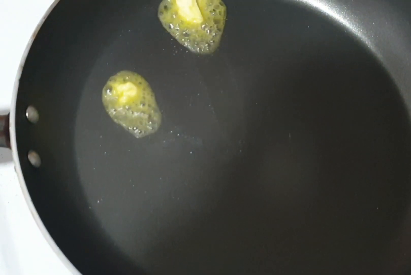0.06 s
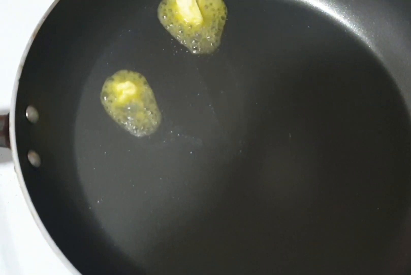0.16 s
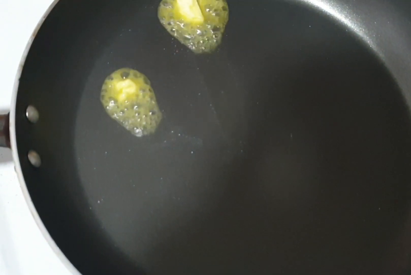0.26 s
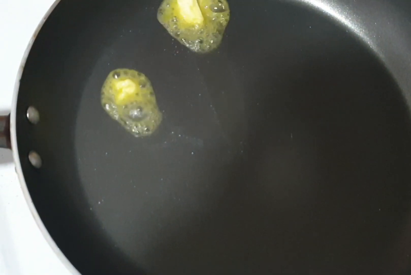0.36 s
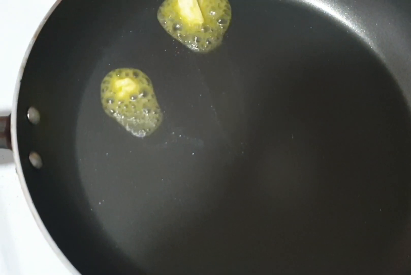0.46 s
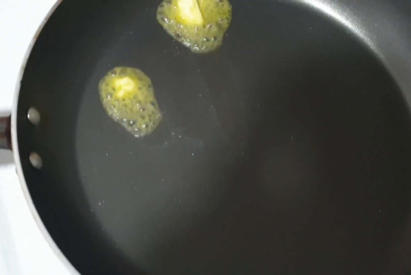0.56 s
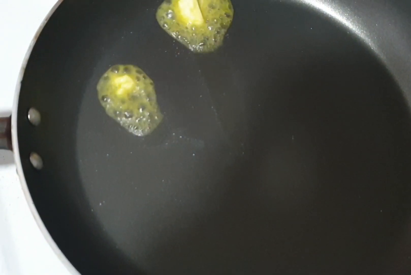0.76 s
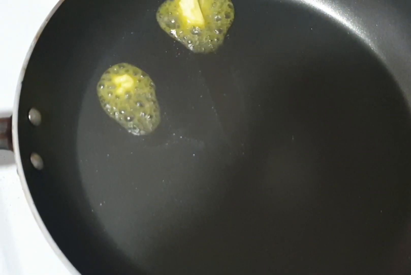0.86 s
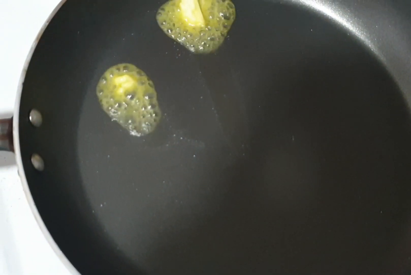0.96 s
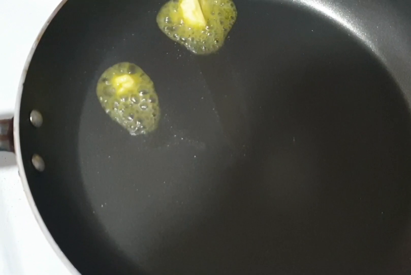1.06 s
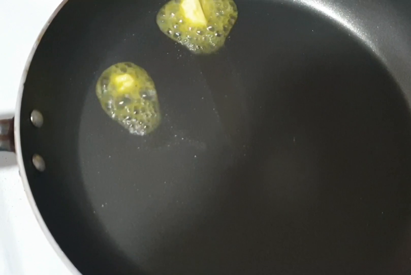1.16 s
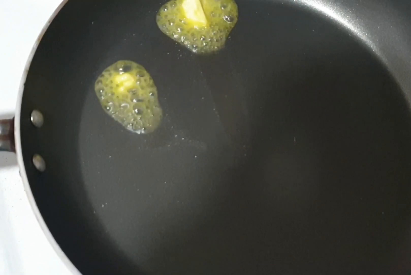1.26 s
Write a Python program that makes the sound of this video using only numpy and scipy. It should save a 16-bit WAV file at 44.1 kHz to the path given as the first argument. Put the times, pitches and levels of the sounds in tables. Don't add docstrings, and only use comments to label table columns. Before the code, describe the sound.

Butter sizzles close by in a hot pan, a dense bright fizz with small sharp pops. Early on, steel cutlery drops on the worktop, clanks, rattles and rings in a hard kitchen over faint extractor hum.

```python
import sys
import numpy as np
from scipy import signal
from scipy.fft import rfft, irfft, next_fast_len
from scipy.io import wavfile
from scipy.ndimage import uniform_filter1d, map_coordinates

SR = 44100
rng = np.random.default_rng(int(sys.argv[2]) if len(sys.argv) > 2 else 0)


def volts_from_db(level):
    exponent = np.asarray(level, float) / 20
    return 10 ** exponent


def to_wav(sig):
    pcm = np.clip(np.atleast_2d(sig), -1, 1) * 32767
    pcm = np.round(pcm).astype(np.int16)
    wavfile.write(sys.argv[1], SR, pcm.T)


N = 57330
TIME_S = np.arange(N) / SR

# (frequency [Hz], density [dB per Hz])
WORKTOP_COLOUR = [(150, -28.5), (300, -19.5), (800, -19), (1300, -5), (2000, -6.5), (3300, -5), (5500, -15),
                  (8500, -16.5), (15900, -23)]


def unit(x):
    return x / np.sqrt(np.mean(x ** 2) + 1e-20)


def along(points, hz):
    point_hz, value = np.transpose(points)
    return np.interp(np.log(hz + 1), np.log(point_hz + 1), value)


def wobble(knots_per_s):
    knots = rng.standard_normal(int(N * knots_per_s / SR) + 4)
    return map_coordinates(knots, [np.arange(N) * knots_per_s / SR])


def colour(x, points):
    size = next_fast_len(N + 8192)
    gain = volts_from_db(along(points, np.fft.rfftfreq(size, 1 / SR)))
    return irfft(rfft(x, size) * gain, size)[..., :N]


def patchy(patchy_db):
    z = signal.stft(rng.standard_normal((2, N)), nperseg=256)[2]
    field = uniform_filter1d(rng.standard_normal(z.shape[1:]), size=10, axis=0)
    field = uniform_filter1d(field, size=5, axis=1)
    noise = signal.istft(z * volts_from_db(patchy_db * unit(field)), nperseg=256)[1]
    return unit(noise[:, :N])


def bursts(start_s, gain, hz, cycles, size=256):
    t = np.arange(size) / SR
    age = 6 * t * hz[:, None] / cycles
    envelope = gain[:, None] * (age / 2) ** 2 * np.exp(2 - age)
    first = np.round(start_s * SR).astype(int)
    index = (first[:, None] + np.arange(size)).ravel()
    ports = []
    for phase in rng.uniform(0, 2 * np.pi, (len(start_s), 2)).T:
        waves = envelope * np.sin(2 * np.pi * hz[:, None] * t + phase[:, None])
        ports.append(np.bincount(index, waves.ravel(), N + size)[:N])
    return np.array(ports)


def alike(pair):
    # (frequency [Hz], left-right correlation [0..1])
    likeness = [(60, 0.28), (130, 0.84), (290, 0.971), (640, 0.43), (1400, 0.19), (3000, 0.013)]
    turn = [(hz, np.arccos(np.clip(c, 0, 1)) / 2) for hz, c in likeness]
    mid = colour(pair[0], [(hz, 20 * np.log10(np.cos(u))) for hz, u in turn])
    side = colour(pair[1], [(hz, 20 * np.log10(np.sin(u) + 1e-3)) for hz, u in turn])
    return np.array([mid + side, mid - side])


def shade(pair, points):
    return np.array([pair[0], colour(pair[1], points)])


def bubble_bed(count=5000):
    # (time [s], level [dB])
    heat = [(0.0, -46.5), (0.22, -47), (0.52, -47.5), (1.3, -49)]
    # (frequency [Hz], density [dB per Hz])
    fizz = [(880, -23.5), (1500, -17), (3050, -12.5), (5310, -3), (7960, -10.5), (10600, -0.5), (12800, -1),
            (13800, -4), (15900, -7.5)]
    fizz_db, grain_db, spread_db, patchy_db = 11.5, -6, 3.5, 1.5
    centre_hz, grain_cycles = 9130, 2.26
    heat_s, strength_db = np.transpose(heat)
    level_db = np.interp(TIME_S, heat_s, strength_db)

    busy = np.cumsum(volts_from_db(4.5 * wobble(45)))
    draw = rng.random((count, 2))
    start_s = np.interp(draw[:, 0], busy / busy[-1], TIME_S)
    hz = np.clip(centre_hz * np.exp(0.52 * rng.standard_normal(count)), 1500, 15500)
    gain = volts_from_db(-spread_db * np.log(draw[:, 1] + 0.0065))
    grains = unit(bursts(start_s, gain, hz, grain_cycles))

    bed = colour(patchy(patchy_db) + volts_from_db(grain_db) * grains, fizz)
    return bed / np.std(bed[0]) * volts_from_db(fizz_db + level_db + 0.27 * wobble(13))


def bubble_pops(pop_s, peak_db, hz):
    pop_db, pop_cycles = -1.5, 9
    echo_db, echo_s = -8, .0027
    snap_db, snap_cycles = -6.5, 1.8
    pops = bursts(pop_s, volts_from_db(peak_db + pop_db), hz, pop_cycles)
    echoes = bursts(pop_s + echo_s, volts_from_db(peak_db + pop_db + echo_db), hz, pop_cycles)
    snaps = bursts(pop_s, volts_from_db(peak_db + snap_db), 0.79 * hz, snap_cycles)
    return pops + echoes + snaps


def sizzle():
    # (time [s], peak [dB], frequency [Hz])
    pop_table = [(0.041, -17, 13100), (0.1341, -18.5, 10440), (0.5184, -31, 4570), (0.5474, -27.5, 9880),
                 (0.578, -23.5, 5760), (0.6677, -23.5, 5850), (0.7684, -19.5, 10800), (0.8524, -28, 13500),
                 (0.8999, -24, 10400), (0.9724, -24.5, 10100), (1.0136, -21.5, 11500),
                 (1.0285, -15.5, 14300), (1.0404, -50, 10200), (1.069, -36, 9770), (1.1036, -27, 5530),
                 (1.2164, -18.5, 5100), (1.2468, -23, 10400)]
    # (frequency [Hz], level [dB])
    pan_shadow = [(200, 11.5), (700, -30), (1300, -3), (2400, -29), (4400, -57), (7600, -40), (11000, -20),
                  (15000, -38.5)]
    spatter_db, spatter_s, spatter_ref_db = 1.5, 0.009, -23.5
    bed = bubble_bed()
    pop_s, peak_db, hz = np.transpose(pop_table)
    pop_s = pop_s + .0007
    pops = bubble_pops(pop_s, peak_db, hz)
    distance = (TIME_S - pop_s[:, None] - spatter_s / 2) / spatter_s
    weight = np.minimum(volts_from_db(peak_db - spatter_ref_db), 1)
    spatter = (weight[:, None] * np.exp(-distance ** 2)).max(axis=0)
    return shade(bed * volts_from_db(spatter_db * spatter) + pops, pan_shadow)


def extractor():
    # (frequency [Hz], density [dB per Hz])
    air_colour = [(94, -2), (160, 0.5), (176, -10.5), (286, -2.5), (405, -11.5), (723, 0.5), (784, 1.5),
                  (1270, -16.5), (4000, -15.5), (5200, -18), (8800, -120)]
    # (frequency [Hz], density [dB per Hz])
    rumble_colour = [(13, -33), (22, -34), (32, -8), (54, -26), (66, -7.5), (76, -5), (128, -11),
                     (173, -31), (200, -17), (260, -47), (440, -120)]
    # (frequency [Hz], level [dB rms])
    motor_lines = [(51, -51), (68, -60), (123, -59), (740, -66.5)]
    air_db, rumble_db = -59, -60
    air = volts_from_db(air_db) * unit(colour(alike(patchy(1.2)), air_colour))
    rumble = volts_from_db(rumble_db) * unit(colour(alike(patchy(0.3)), rumble_colour))
    hum = 0
    for hz, level_db in motor_lines:
        gain = volts_from_db(level_db - 2.5 + 4.1 * wobble(7.05))
        hum = hum + gain * np.sin(2 * np.pi * hz * TIME_S + 0.68 * wobble(6.8))
    low = rumble + hum * volts_from_db([[1.1], [-1.1]])
    return air * volts_from_db([[.6], [-.6]]) + low * volts_from_db([[1.6], [-1.6]])


def room(x):
    # (frequency [Hz], T60 [s])
    kitchen_decay = [(200, 0.7), (1000, 0.63), (4000, 0.49), (12000, 0.45)]
    hz, t, z = signal.stft(alike(rng.standard_normal((2, N))), SR, nperseg=256)
    decay_db = -60 * t / along(kitchen_decay, hz)[:, None]
    tail = signal.istft(z * volts_from_db(decay_db), SR, nperseg=256)[1]
    return signal.fftconvolve(x[None], tail / np.linalg.norm(tail[0]), axes=1)[:, :N]


def strike(contacts, modes_hz, modes):
    treble_hz = 9000
    blow_t60_s, rise_s = 0.042, .0015
    blow_offset_db, ring_offset_db = 4.5, -13
    blow_wet_db, ring_wet_db = 5.5, -10
    rock_db, rock_rad, rock_per_s = 3, 1, 90
    hz = np.c_[modes_hz]
    mode_db, t60_s = np.transpose(modes)[:, :, None]
    treble = hz > treble_hz

    blow_power, ring_power = 0, 0
    for contact_s, blow_db, ring_db, treble_db in contacts:
        age_s = np.clip(TIME_S - contact_s, 0, None)
        rise = 1 - np.exp(-age_s / rise_s)
        level_db = ring_db + ring_offset_db + mode_db + treble_db * treble
        ring_power = ring_power + (rise * volts_from_db(level_db - 60 * age_s / t60_s)) ** 2
        blow = rise * volts_from_db(blow_db + blow_offset_db - 60 * age_s / blow_t60_s)
        blow_power = blow_power + blow ** 2

    rock = np.array([[[wobble(rock_per_s) for _ in modes] for _ in "LR"] for _ in "ap"])
    partials = np.sin(2 * np.pi * hz * TIME_S + rock_rad * rock[1])
    ring = (np.sqrt(ring_power) * volts_from_db(rock_db * rock[0]) * partials).sum(axis=1)
    blows = colour(np.sqrt(blow_power) * alike(rng.standard_normal((2, N))), WORKTOP_COLOUR)
    return ring + blows + room(volts_from_db(blow_wet_db) * blows[0] + volts_from_db(ring_wet_db) * ring[0])


def slide():
    start_s, end_s, end_db, db_per_s = 0.218, .25, -6.5, 672
    gain = volts_from_db(end_db + db_per_s * np.minimum(TIME_S - end_s, 0))
    gain = gain * (TIME_S > start_s) * (TIME_S < end_s)
    return colour(gain * alike(rng.standard_normal((2, N))), WORKTOP_COLOUR)


def thud(hit_s):
    level_db, hz, t60_s = -46.5, 67.2, 1
    age_s = np.clip(TIME_S - hit_s, 0, None)
    return volts_from_db(level_db - 60 * age_s / t60_s) * np.sin(2 * np.pi * hz * age_s)


def clatter():
    # (time [s], blow [dB], ring [dB], extra treble ring [dB])
    rattle = [
        (.2345, -16.5, -16.5, -21),
        (.2404, -11.5, -4.5, -30),
        (.2505, -2.5, -3.5, 7),
        (.2595, -12, -23, -17),
        (.2695, -11.5, -30, -17),
        (.303, -9, -11.5, -20),
        (.338, -9.5, -15, -2),
    ]
    second_knock = [
        (.4758, -20.5, -25.5, 7),
        (.512, -41, -44, -1),
    ]
    # (level [dB], T60 [s])
    steel_hz = [1646, 1879, 2087, 2405, 4005, 4075, 4220, 4367, 7501, 7600, 8003, 11016, 11108, 14100]
    steel = [(-15.5, 0.2), (-16.5, 0.48), (-11, 0.22), (-15, 0.17), (-8, 0.49), (-1.66, 0.51), (-5.5, 0.34),
             (-5.5, 0.24), (-14, 0.32), (-14, .45), (-8.5, 0.29), (-1.5, 0.1), (-7, 0.3), (-22, .07)]
    # (level [dB], T60 [s])
    second_steel_hz = [1640, 2880, 4367, 6767, 8016, 9700, 12170]
    second_steel = [(-18, 0.23), (-3.5, 0.82), (6.5, 0.31), (1, 0.4), (3, 0.13), (-1.5, 0.063), (9, 0.08)]
    # (frequency [Hz], level [dB])
    clatter_shadow = [(200, 1), (700, -4.2), (1300, -5), (2400, -13), (4200, -21.5), (7600, -29),
                      (11100, -11.5), (15000, -30)]
    steel_sound = slide() + strike(rattle, steel_hz, steel) + strike(second_knock, second_steel_hz, second_steel)
    return shade(steel_sound, clatter_shadow) + thud(rattle[2][0])


def scene():
    return sizzle() + clatter() + extractor()


def roll_off(x):
    return signal.sosfilt(signal.butter(12, 16180, fs=SR, output="sos"), x)


def record(dry):
    # (frequency [Hz], gain [dB])
    band_limit = [(15500, 0), (15850, -8), (16050, -70)]
    turn_down_db, turn_at_s, turn_s = -3, 0.33, 0.09
    age_s = np.clip(TIME_S - turn_at_s, 0, None)
    gain = volts_from_db(-turn_down_db * np.exp(-age_s / turn_s))
    heard = colour(np.clip(dry * gain, -1, 1), band_limit)
    return roll_off(heard)


dry = scene()
out = record(dry)
to_wav(out)
```